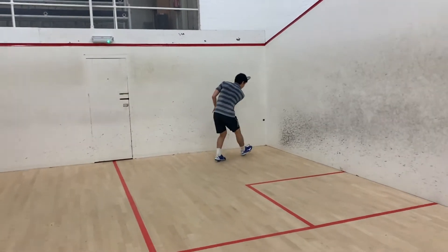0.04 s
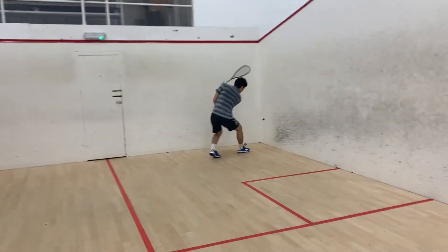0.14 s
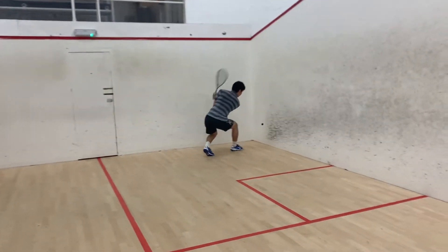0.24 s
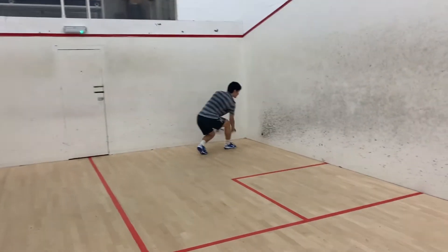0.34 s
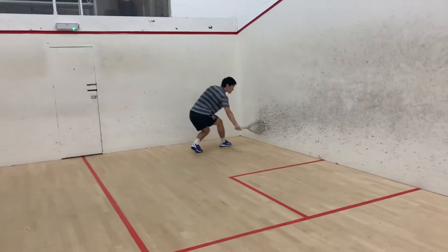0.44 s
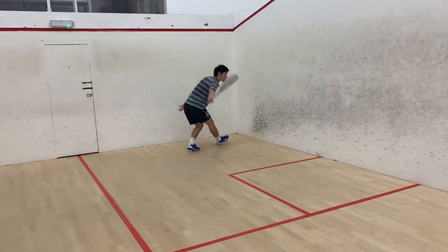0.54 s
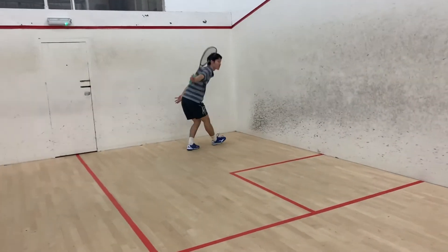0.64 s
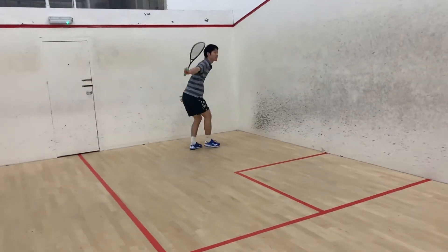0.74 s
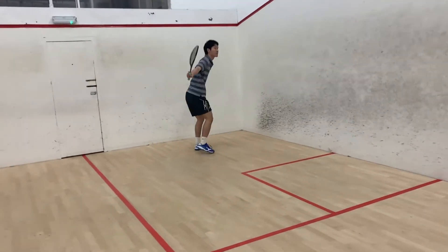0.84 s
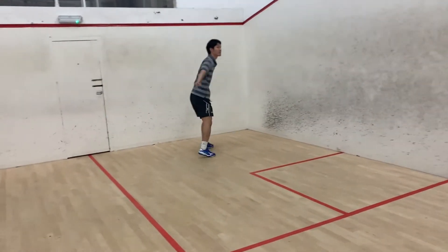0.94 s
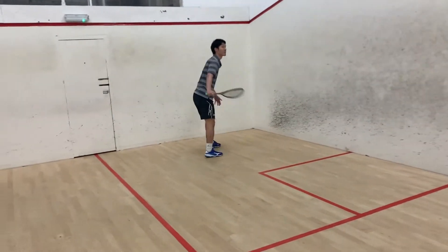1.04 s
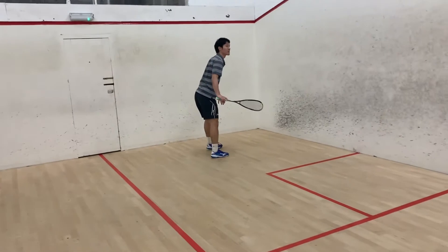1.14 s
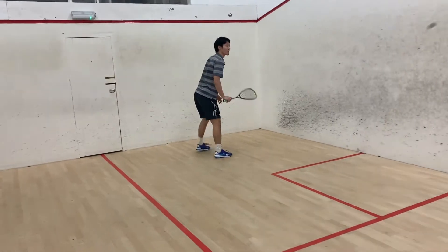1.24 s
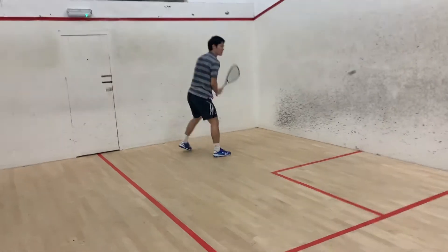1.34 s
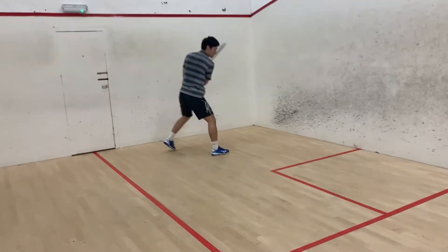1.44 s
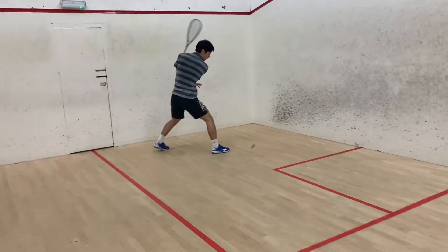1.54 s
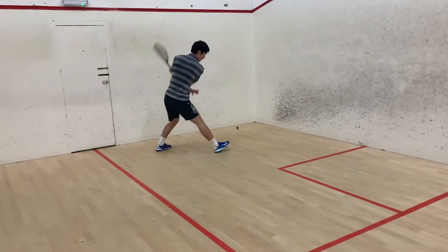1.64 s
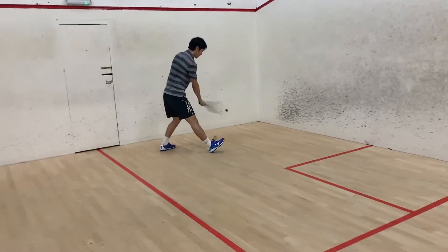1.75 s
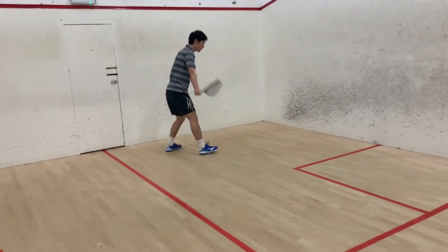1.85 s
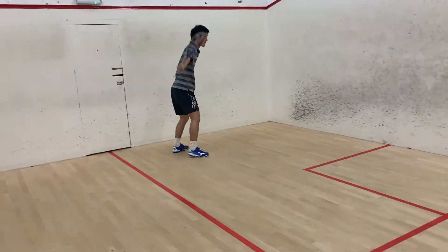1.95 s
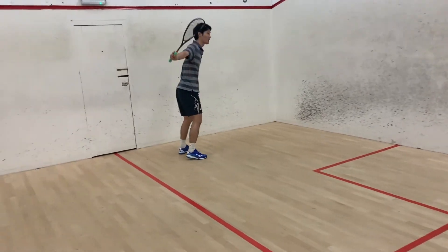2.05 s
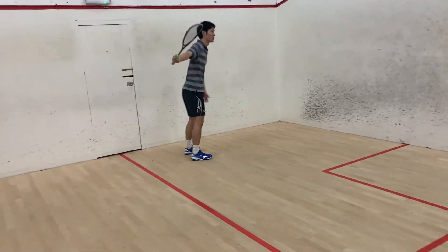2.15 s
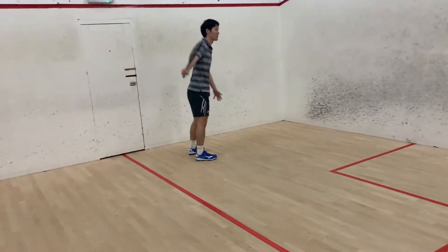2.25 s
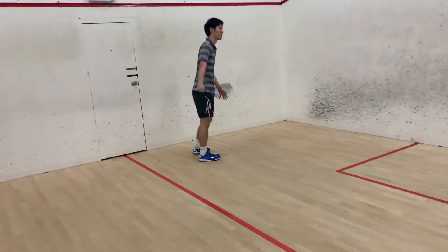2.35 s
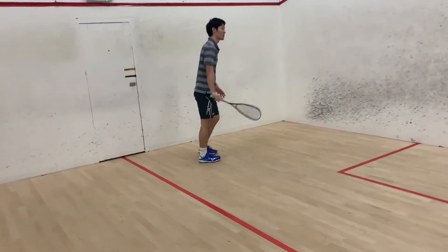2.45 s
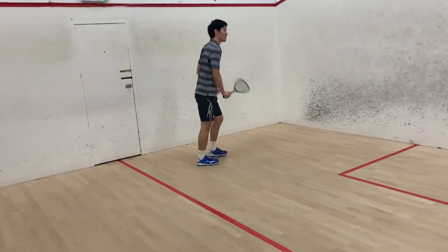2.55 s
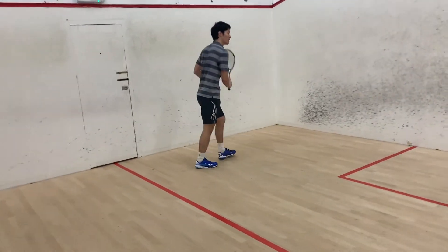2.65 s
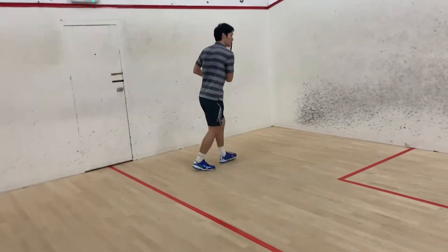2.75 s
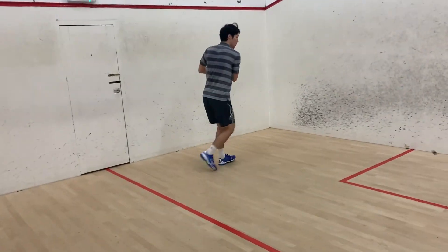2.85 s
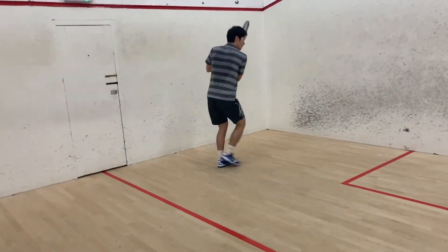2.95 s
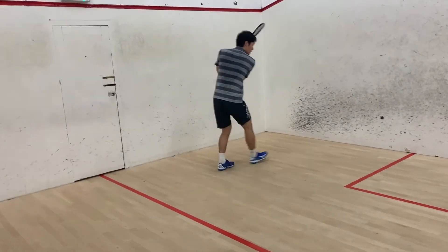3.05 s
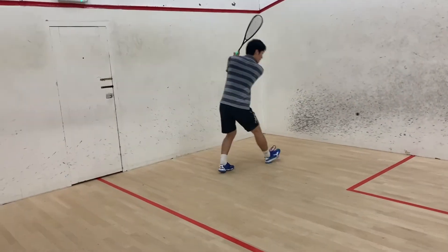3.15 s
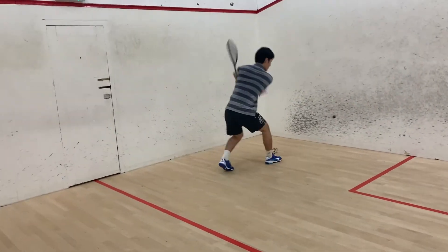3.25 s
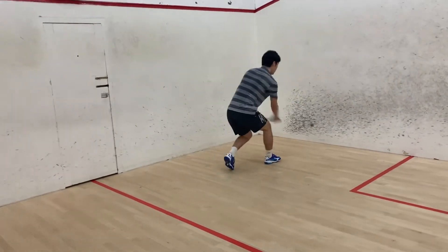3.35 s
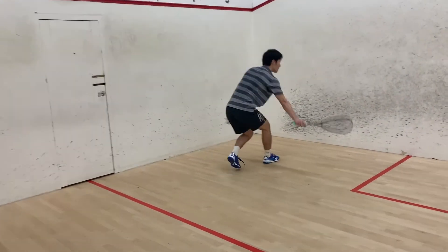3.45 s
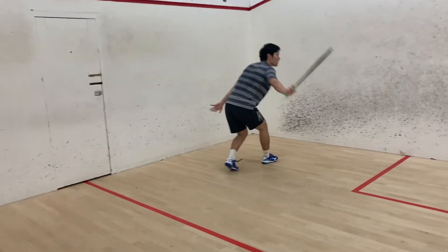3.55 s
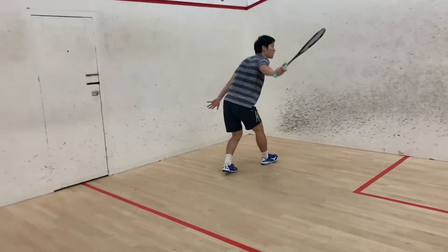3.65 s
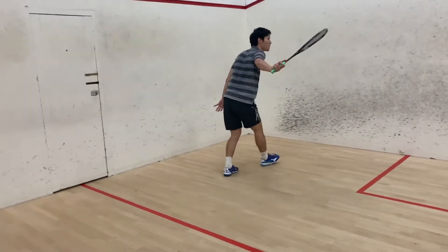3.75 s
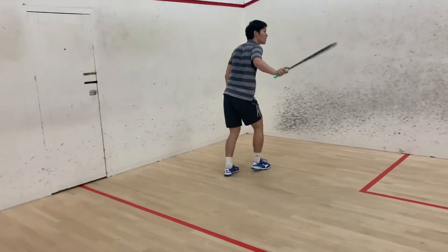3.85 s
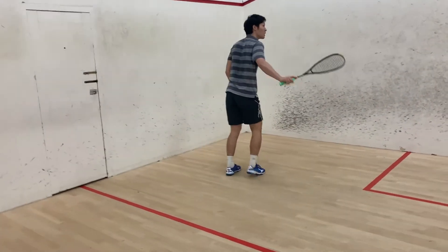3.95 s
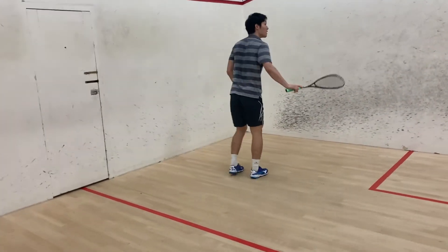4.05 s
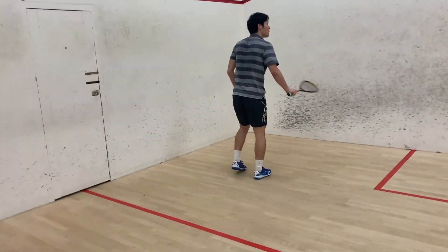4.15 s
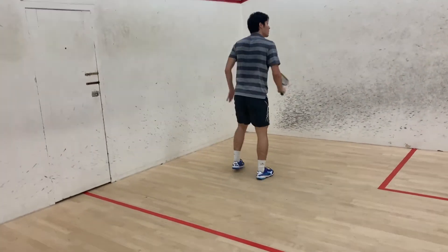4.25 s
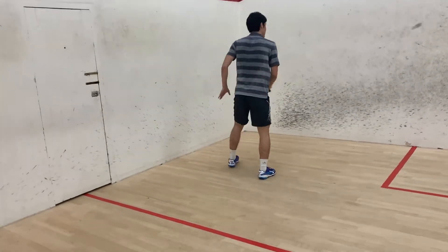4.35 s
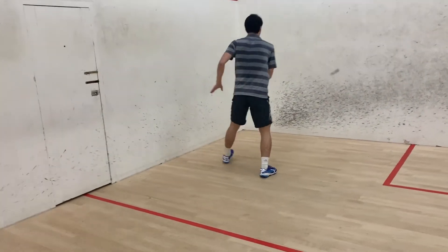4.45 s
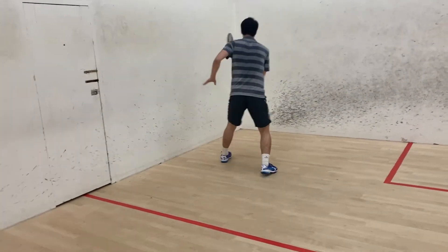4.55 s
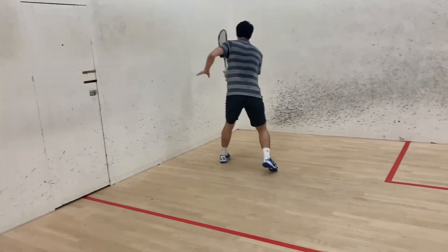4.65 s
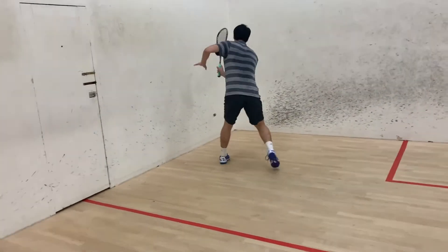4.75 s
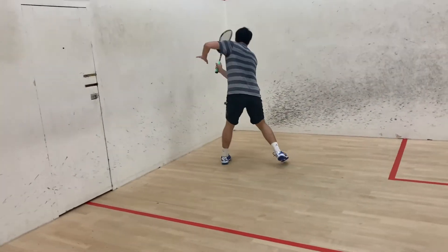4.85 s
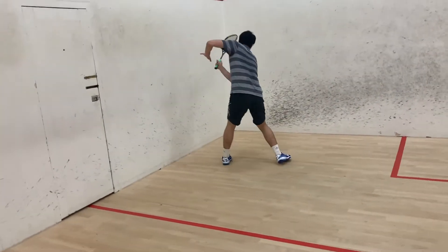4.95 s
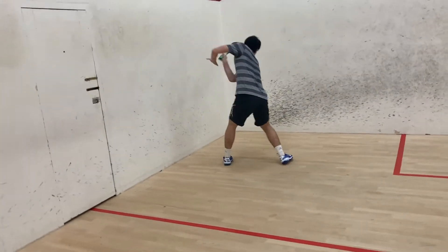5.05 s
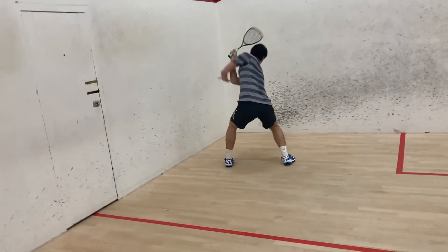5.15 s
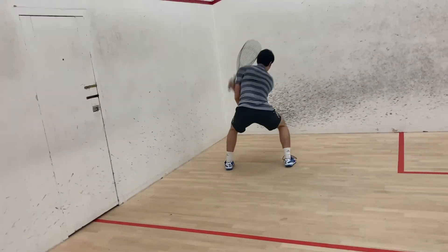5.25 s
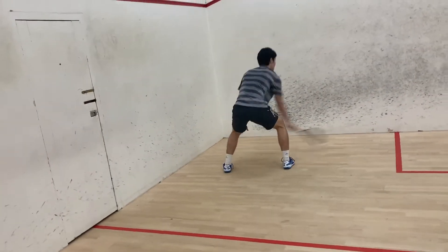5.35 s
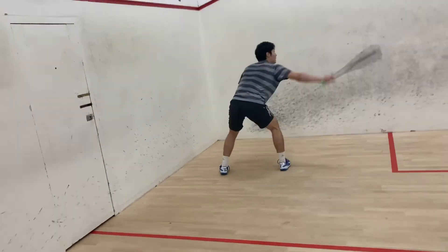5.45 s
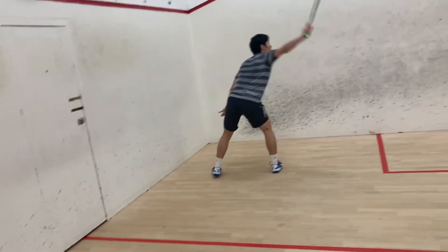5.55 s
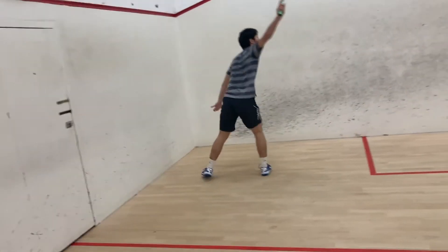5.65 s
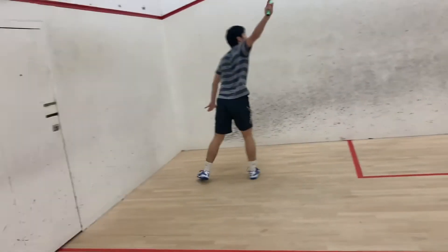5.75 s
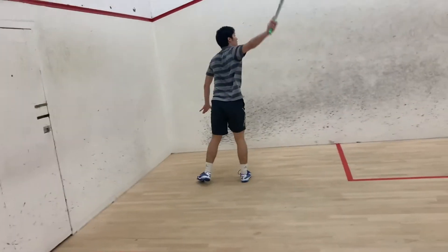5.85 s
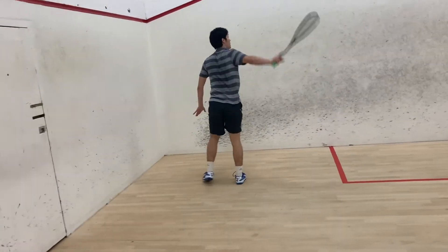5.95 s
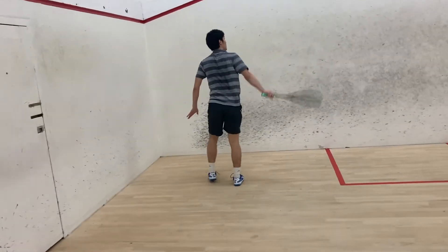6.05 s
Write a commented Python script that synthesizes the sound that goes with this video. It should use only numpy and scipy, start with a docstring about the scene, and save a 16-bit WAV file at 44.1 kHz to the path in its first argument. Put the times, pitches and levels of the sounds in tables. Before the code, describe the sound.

The sound opens in the dying ring of an earlier shot, over faint low building hum in a hard-walled squash court. At 0.46 s a short air swish ends in a hollow, stringy racket pop; at 0.7 s the ball cracks sharply on the front wall, with clattering echoes. Soft shoe and floor thuds come around 1.6 s. Near 1.8 s a very short, high sole squeak chirps with the second, brighter stroke at 1.84 s; the wall crack follows at 2.06 s, with a faint scuffed squeak just before. A low bounce thumps at 2.9 s, a softer step at 3.2 s, then stroke at 3.46 s and crack at 3.67 s. Dull thuds sound around 4.6-5 s. The strongest, woodiest stroke lands at 5.42 s, its crack at 5.6 s. Every blow blooms into seconds-long, ringing reverberation, heard from mid court, still hanging at the end.

```python
"""First an earlier crack, still ringing over building hum in a hard-walled squash court; then a lone drill.
From a microphone at mid court: racket swishes and strokes, the ball cracking on the front wall,
thuds of ball and shoe on sprung boards, squeaking soles. Blows are noise cracks over decaying modes,
swishes are swelling noise, squeaks are gliding tones; shaped noise and slowly dying tones make
the reverberation that hangs for seconds between the plaster walls."""
import sys
import numpy as np
from scipy import signal
from scipy.fft import rfft, irfft
from scipy.io import wavfile
from scipy.ndimage import uniform_filter1d

SR = 44100
rng = np.random.default_rng(int(sys.argv[2]) if len(sys.argv) > 2 else 0)


def persist_wave(psi):
    """Save psi, clipped to +-1, as 16-bit WAV."""
    counts = np.round(np.clip(psi, -1, 1) * 32767).astype(np.int16)
    wavfile.write(sys.argv[1], SR, np.atleast_2d(counts).T)


N = 269451  # samples

# Racket on ball: t/s, direct peak/dB, court level/dB, treble tilt/dB, left minus right/dB, contact null f/Hz,
# ring at the favoured pitch/dB, favoured f/Hz, fall-off away from it/(dB per octave squared)
STROKES = [(0.4594, -8, -20, -4.5, 5.5, 636, 4, 690, 6), (1.8376, -10.5, -21.5, 3.5, 3, 646, 12, 320, 1.5),
           (3.4594, -13.5, -23.5, -0.5, 8, 625, 5.5, 800, 2), (5.4213, -6.5, -18, 1.5, 3, 690, 8, 960, 11)]
# Ball on the front wall: the same columns as the strokes
CRACKS = [(0.6945, 0.5, -18, 0.21, -4.5, 1136, 4.7, 553, 13),
          (2.0564, -5.5, -15, -0.52, 14, 1200, 0.68, 397, 0.77),
          (3.674, -7.5, -16, 0.9, -12, 1183, 4.7, 500, 0.65),
          (5.6026, -5, -16.5, 0.34, 12, 1510, 13.9, 1490, 14)]
# Colour of ball on plaster: f/Hz, relative level/dB
PLASTER = [(50, -31.5), (130, -18), (300, -6.5), (1000, -12), (1600, -12), (3000, -20), (6000, -25),
           (12000, -24), (16500, -33.5)]
# Modes of frame and string bed: f/Hz, relative level/dB, t60/s
RACKET = [(342, -4, 0.018), (500, -9.5, 0.01), (818, -13, 0.018), (1042, -3, 0.011), (1603, -6.5, 0.0088)]
# Modes of ball and plaster: f/Hz, relative level/dB, t60/s
WALL = [(419, -10, 0.019), (510, -17.5, 0.027), (805, -8, 0.0085), (2205, -20, 0.006)]
EARLIER_S, EARLIER_COURT_DB = -1.1, -15.5  # a crack before the start still rings
FLOOR_ECHO = (.0035, -10, 0)  # first echo off the boards: delay/s, level/dB, blur/s


def amp(db):
    """Turn decibels into a factor on sound pressure."""
    return 10 ** (np.asarray(db) / 20)


def evened(x):
    """Bring a signal to unit RMS."""
    return x / np.sqrt(np.mean(x ** 2) + 1e-20)


def read(points, hz):
    """Read a curve of (f/Hz, value) points along a logarithmic frequency axis."""
    f, value = np.transpose(points)
    return np.interp(np.log(hz + 1), np.log(f + 1), value)


def add(mix, s, sound):
    """Lay a sound into the mix at s seconds, trimming whatever falls outside."""
    at = round(s * SR)
    sound = sound[:, max(-at, 0):]
    part = mix[:, max(at, 0):][:, :sound.shape[1]]
    part += sound[:, :part.shape[1]]


def sides(pan_db, x, lag_s=.00013):
    """Place a direct sound by level; the right port hears it a little sooner."""
    late = np.concatenate([np.zeros(round(lag_s * SR)), x])[:len(x)]
    return amp([[pan_db / 2], [-pan_db / 2]]) * np.array([late, x])


def noise(seconds, shape_db):
    """Two partly alike channels of noise; shape_db(hz, t) sets the level of every bin."""
    # Likeness swings in sign across the treble: f/Hz, left-right likeness
    likeness = [(60, 1), (130, 0.78), (290, 0.83), (640, -0.17), (1400, -0.23), (3100, 0.03), (7000, 0.17),
                (8600, -1.35), (9600, -0.23), (11500, 1.5), (13500, -3), (15300, 2.4)]
    # Stereo balance: f/Hz, left minus right/dB
    balance = [(60, 1.5), (200, 0.5), (700, 2), (2400, 1.5), (8000, 0)]
    frames = int(seconds * SR) // 128 + 5
    hz = np.fft.rfftfreq(512, 1 / SR)[:, None]
    a, b, c, d = rng.standard_normal((frames, 257, 4)).T
    same = np.clip(read(likeness, hz), -1, 1)
    left = a + 1j * b
    right = same * left + np.sqrt(1 - same ** 2) * (c + 1j * d)
    level_db = shape_db(hz, np.arange(frames) * 128 / SR)
    balance_db = np.array([.5, -.5])[:, None, None] * read(balance, hz)
    bins = np.array([left, right]) * amp(level_db + balance_db)
    return signal.istft(bins, nperseg=512, noverlap=384)[1][:, :int(seconds * SR)]


def court(seconds=3, lumpy_s=0.06, patchy_db=2.0):
    """Reflections that start uneven and crowd together in patches, each band dying at its own speed."""
    # Reverberation: f/Hz, t60/s
    decay = [(50, 5.15), (110, 0.29), (200, 2), (420, 2.96), (1100, 3.15), (2900, 2.57), (5500, 1.56),
             (8000, 1.116), (12000, 0.62), (16000, 0.35)]
    # Low reflections gather later: f/Hz, rise time/s
    bass_rise = [(300, 0.023), (1000, 0.014), (2500, .006)]
    lumps_db, rise_s = 4.5, .007  # early bunching; time the reflections need to crowd together

    def level_db(hz, t):
        patches = uniform_filter1d(rng.standard_normal((len(t), len(hz))), size=5, axis=0)
        patches = uniform_filter1d(patches, size=4, axis=1).T
        rise = 1.001 - np.exp(-(t / read(bass_rise, hz)) ** 2)
        return 20 * np.log10(rise) - 60 * t / read(decay, hz) + patchy_db * evened(patches)

    tail = noise(seconds, level_db)
    t = np.arange(tail.shape[1]) / SR
    knots = t[::110]
    lumps = np.interp(t, knots, np.tanh(rng.standard_normal(len(knots))))
    bunching = amp(lumps_db * lumps * np.exp(-t / lumpy_s))
    return tail * bunching * (1 - np.exp(-(t / rise_s) ** 2))


def grain(size):
    """A causal filter of random narrow peaks and dips, about 15 Hz wide, drawn anew for each blow's tail."""
    grain_db = 2
    bumps = uniform_filter1d(rng.standard_normal(size // 2 + 1), size=30)
    bumps = evened(uniform_filter1d(bumps, size=30))
    log_gain = np.log(amp(grain_db * np.concatenate([bumps, bumps[-2:0:-1]])))
    return np.exp(np.conj(signal.hilbert(log_gain)))[:size // 2 + 1]  # minimum phase


def ringing(court_db, colour, modes, treble_db, null_hz, null_width):
    """The court's answer to one blow: crack colour, modes, contact-time null and uneven ringing."""
    tail = court()
    hz = np.fft.rfftfreq(tail.shape[1], 1 / SR)
    crack = amp(read(colour, hz) + read([(1500, 0), (6000, treble_db)], hz))
    # each mode is a resonance, narrower the longer it rings
    rings = sum(amp(db) ** 2 / (1 + ((hz - f) * t60 / 0.76) ** 2) for f, db, t60 in modes)
    low_cut = np.minimum(hz / modes[0][0], 1)
    null = 1 - .8 * np.exp(-(np.log(hz / null_hz + 1e-9) / null_width) ** 2)
    response = np.sqrt(crack ** 2 + rings * low_cut ** 2) * null * grain(tail.shape[1])
    tail = irfft(rfft(tail) * response)
    tail *= np.clip(np.linspace(11, -1, tail.shape[1]), 0, 1)  # fade the end to silence
    return amp(court_db) * tail / np.sqrt(np.mean(tail[:, :SR // 10] ** 2))


def standing(tones, spread_hz):
    """Slowly dying tones, each a close pair that beats, with its own phase at each port."""
    t = np.arange(3 * SR) / SR
    out = np.zeros((2, len(t)))
    for hz, db, t60 in tones:
        shift, left, right = rng.random((2, 3)).T[:, :, None]
        turn = 2 * np.pi * (hz + spread_hz * (shift - .5)) * t
        pair = [(amp([[0], [-6]]) * np.sin(turn + 2 * np.pi * phase)).sum(0) for phase in (left, right)]
        out += amp(db - 60 * t / t60) * np.array(pair)
    return out * (1 - np.exp(-t / 0.026)) * np.minimum((3 - t) / .3, 1)


def struck(modes, ring_db, favoured_hz, fall_db):
    """The modes as one blow excites them: those near the favoured pitch ring most."""
    return [(hz, db + ring_db - abs(fall_db) * np.log2(hz / favoured_hz) ** 2, t60)
            for hz, db, t60 in modes]


def snap(size, treble_db):
    """Noise with the colour of the bare crack, tilted above 3 kHz."""
    # Bare crack: f/Hz, relative level/dB
    crack_colour = [(400, -36.5), (1500, 6.5), (2500, 16.5), (4500, 6.5), (9000, -7), (16000, -9.5)]
    hz = np.fft.rfftfreq(size, 1 / SR)
    colour_db = read(crack_colour, hz) + read([(3000, 0.0055), (9000, treble_db)], hz)
    return irfft(rfft(rng.standard_normal(size)) * amp(colour_db), size)


def blow(peak_db, modes, treble_db, crack_s, crack_db, cycles, echoes):
    """A short rubbery noise crack over modes that swell in within about one cycle, with its first echoes."""
    t = np.arange(8192) / SR
    crack = snap(len(t), treble_db) * t / crack_s * np.exp(-t / crack_s)
    crack /= np.sqrt(np.sum(crack ** 2) / (SR * crack_s))
    rings = sum(amp(db - 60 * t / t60) * (1 - np.exp(-(t * hz / cycles) ** 2)) * np.sin(2 * np.pi * hz * t)
                for hz, db, t60 in modes)
    x = rings / abs(rings).max() + amp(crack_db) * crack
    x = x + sum(amp(db) * np.roll(uniform_filter1d(x, 1 + round(blur_s * SR)), round(s * SR))
                for s, db, blur_s in echoes)
    return amp(peak_db) * x / abs(x).max()


def hits(rows, colour, modes, crack_s, crack_db, cycles, null_width, echoes):
    """Each blow arrives direct and then fills the court."""
    mix = np.zeros((2, N))
    for s, peak_db, court_db, treble_db, pan_db, null_hz, *favoured in rows:
        rung = struck(modes, *favoured)
        direct = blow(peak_db, rung, treble_db, crack_s, crack_db, cycles, echoes)
        add(mix, s, sides(pan_db, direct))
        add(mix, s, ringing(court_db, colour, rung, treble_db, null_hz, null_width))
    return mix


def background():
    """Steady building noise and the dying crack of the previous shot."""
    # Building hum and air: f/Hz, relative level/dB
    hall = [(18, -40), (30, -16), (59, -2), (106, -20.5), (134, -14.5), (355, -20), (1190, -27.5),
            (1350, -44.5), (2230, -30), (16000, -68.5)]
    hall_db = -47
    hum = evened(noise(N / SR + .01, lambda hz, t: read(hall, hz) + 0 * t))
    mix = amp(hall_db) * hum[:, :N]
    earlier = ringing(EARLIER_COURT_DB, PLASTER, WALL, treble_db=2.0, null_hz=1186, null_width=0.021)
    add(mix, EARLIER_S, earlier)
    return mix


def lingering():
    """Strokes and cracks leave court tones hanging; strokes also leave the string bed's notes."""
    # Court tones that outlast the wash: f/Hz, level against the court level/dB, t60/s
    court_tones = [(353, -23, 3.2), (529, -22, 4.1), (776, -20, 3.5), (850, -22, 6.1), (1090, -23.5, 4.3)]
    # String-bed notes hanging in the court: f/Hz, level against the court level/dB, t60/s
    string_tones = [(1072, -17, 1.4), (1645, -20, 1.4)]
    mix = np.zeros((2, N))
    for s, court_db in [row[0:3:2] for row in STROKES + CRACKS] + [(EARLIER_S, EARLIER_COURT_DB)]:
        add(mix, s, amp(court_db) * standing(court_tones, spread_hz=13.65))
    for s, _, court_db, *_ in STROKES:
        add(mix, s, amp(court_db) * standing(string_tones, spread_hz=30))
    return mix


def squeaks():
    """Stick-slip tones with a wavering, gliding pitch, a rough level and a scrape, carried on by the court."""
    # Short slips of a rubber sole: t/s, length/s, f/Hz, level about which it scatters/dB,
    # second harmonic/dB, pitch spread/share, glide/(Hz per s)
    slips = [(1.782, 0.0052, 3860, -26, -13, .01, -30000), (1.79, 0.0045, 3920, -13.5, -19.5, 0.006, 4997),
             (1.795, 0.017, 3830, -23.5, -14, 0.03, 3998.5), (1.805, 0.017, 4510, -23, -14, 0.025, -15000),
             (1.81, 0.018, 3690, -21, -21, 0.026, -20000), (1.815, 0.016, 4120, -27, -16, 0.0077, 24997.5),
             (1.825, 0.021, 4300, -9, -30, 0.0055, 3002), (1.839, 0.01, 4357, -4, -39.5, 0.0037, -3000),
             (1.977, 0.0095, 3314, -17.5, -8.5, 0.034, -8000),
             (1.988, 0.024, 3400, -25.5, -11, 0.045, -9000), (2.008, 0.029, 3250, -29, -13, 0.05, -6000)]
    # The clearest slip keeps ringing: t/s, then its tones as (f/Hz, level/dB)
    ring_s, ring_tones = 1.835, [(4297, -39), (4350, -36)]
    ring_t60_s, wet_db = 1.9, -9.5  # wet_db: court share
    rough_db, rasp_db = 148, -18  # level scatter per share of pitch spread; scrape against second harmonic
    shoe = np.zeros((1, N))
    for start, length, hz, peak_db, overtone_db, spread, glide in slips:
        t = np.arange(0, length, 1 / SR)
        waver, grip = [evened(uniform_filter1d(rng.standard_normal(2000), size=60))[:len(t)]
                       for _ in range(2)]
        pitch_hz = (hz + glide * (t - length / 2)) * (1 + spread * np.tanh(waver))
        turn = 2 * np.pi * np.cumsum(pitch_hz) / SR
        rasp = amp(rasp_db) * evened(np.diff(rng.standard_normal(2001)))[:len(t)]
        swell = amp(peak_db + rough_db * spread * np.tanh(grip)) * np.sin(np.pi * t / length)
        slip = swell * (np.sin(turn) + amp(overtone_db) * (np.sin(2 * turn) + rasp))
        add(shoe, start, slip[None])
    tail = court(patchy_db=.8)
    wet = signal.fftconvolve(shoe, tail / np.linalg.norm(tail[0, :SR // 20]), axes=1)[:, :N]
    mix = sides(4.2, shoe[0]) + amp(wet_db) * wet
    add(mix, ring_s, standing([(*tone, ring_t60_s) for tone in ring_tones], spread_hz=12))
    return mix


def swishes(fade_s=0.012):
    """Air noise that swells with the racket's speed and fades after the blow."""
    # Swings up to the ball: end t/s, length/s, level before the swell/dB
    swings = [(0.472, 0.081, -27), (1.834, 0.13, -31), (3.478, .07, -24.5), (5.424, 0.088, -26)]
    # Colour of the rushing air: f/Hz, relative level/dB
    air_colour = [(80, -27), (300, 29.5), (1000, 14.5), (4000, 11), (16000, 1)]
    mix = np.zeros((2, N))
    for end, length, level_db in swings:
        air = evened(noise(length + fade_s, lambda hz, t: read(air_colour, hz) + 0 * t))
        t = np.arange(air.shape[1]) / SR
        speed = np.interp(t, [0, length, length + fade_s], [0, 1, 0])
        add(mix, end - length, amp(level_db) * air * speed ** 2.43)
    return mix


def corner():
    """Every stroke comes back, duller, from the back corner by the same few echoes."""
    # Back-corner echoes: delay t/s, level against the stroke/dB
    returns = [(.004, -4), (0.022, -28)]
    mix = np.zeros((2, N))
    rung = struck(RACKET, ring_db=0, favoured_hz=300, fall_db=0.5)
    for s, peak_db, _, treble_db, pan_db, *_ in STROKES:
        for delay_s, loss_db in returns:
            echo = blow(peak_db + loss_db, rung, treble_db, crack_s=0.0019, crack_db=-26 + treble_db,
                        cycles=0.48, echoes=[FLOOR_ECHO])
            add(mix, s + delay_s, sides(pan_db, echo))
    return mix


def slaps():
    """Short pitched knocks: parts of the blows and echoes that stand out, each ringing at one pitch."""
    # Knocks: t/s, peak level/dB, brightness/dB, left minus right/dB, f/Hz
    knocks = [(0.4605, -10.5, -5, -3, 715), (0.4675, -13, -8, 3, 340), (0.479, -19, -10, 2, 310),
              (0.521, -13, -10, -2, 375), (0.572, -16, -10, 8, 365), (0.601, -15, -10, 6, 407),
              (0.705, -19.5, 17, 27, 2050), (0.712, -13, 10, -8, 2200), (0.737, -15, 3, 5, 320),
              (0.792, -24, -6, 4, 384), (0.851, -15.5, -8, 6, 366), (1.652, -28, -15, 4, 114),
              (1.712, -26, -15, 0, 110), (1.732, -29, -15, 0, 124), (1.772, -42, -15, 0, 111),
              (2.066, -10, 10, -19, 2160), (2.087, -14.5, -1, 4, 863), (2.093, -8, -11, -3, 300),
              (2.111, -13, -11, -5, 370), (2.148, -26, -6, 2, 340), (2.948, -22.5, -15, -2, 150),
              (2.985, -23, -15, .5, 161), (3.255, -28, -15, 3, 119), (3.464, -12.5, -11, 2.1, 350),
              (3.495, -25, -4, 5, 493), (3.678, -8, 11, 9, 403), (3.6995, -5, 3, -1, 726),
              (3.711, -14, -1, 19, 1900), (3.725, -12, 5, 5, 470), (3.733, -18, -3, 2, 760),
              (3.767, -13, -5, .5, 850), (4.705, -23, -5, 7, 320), (4.725, -22, -13, 1.1, 186),
              (4.764, -25, -15, 1.1, 131), (4.808, -23, -11, 0, 213), (4.972, -25, -10, -1, 268),
              (5.13, -34, -14.5, 2, 98), (5.4227, -4, -10, 1, 960), (5.426, -9, -13.5, -3, 294),
              (5.529, -14, -8, 1.1, 402), (5.586, -14.5, -8, 2, 336), (5.604, -12.5, -6, -5, 525),
              (5.6155, -13, -3, 6, 900), (5.617, -10, 14, 21, 2300), (5.6446, -3.5, -7, 5, 794),
              (5.752, -12, -11, 2.1, 830)]
    ring_cycles = 10.3  # until the tone is 60 dB down
    mix = np.zeros((2, N))
    for s, peak_db, bright_db, pan_db, hz in knocks:
        knock = blow(peak_db, [(hz, 0, ring_cycles / hz)], bright_db, crack_s=0.00067,
                     crack_db=-11.5 + bright_db, cycles=0.7, echoes=[FLOOR_ECHO])
        add(mix, s, sides(pan_db, knock))
    return mix


def thuds():
    """Ball or sole on sprung boards: low modes under a soft crack, with an echo along the court and back."""
    # Floor blows: the same columns as the strokes
    floor_blows = [(0.066, -36, -44, -1, 1.5, 427, -2, 220, 3.6),
                   (0.47, -22.5, -37, -6, 3, 430, 2, 127, 18),
                   (1.574, -37, -52.5, 20, 2.5, 420, -5, 220, 6.5),
                   (1.637, -26.5, -33, 7, 4, 286, 3.5, 101, 1.6),
                   (2.889, -19.5, -32.5, 3, 1, 430, 9, 159, 93),
                   (3.226, -33.5, -37.5, -6.5, -2, 385, -12, 151, 0.9),
                   (4.569, -35, -41.5, -3, 2, 420, -2.5, 94, 20),
                   (4.703, -22, -29.5, 5, 1, 412, 6, 264, 2.8),
                   (4.999, -25, -46.5, -23.5, 3, 420, 23, 95, 17),
                   (5.43, -40.5, -35.5, -8, -1, 420, 14, 89, 37)]
    # Colour of ball or sole on boards: f/Hz, relative level/dB
    board_colour = [(40, -50), (90, -59), (260, -18), (500, -19), (1500, -24), (6000, -45), (16000, -53.5)]
    # Modes of the sprung boards: f/Hz, relative level/dB, t60/s
    board_modes = [(93.6, -2, 0.05), (114.7, -8, 0.086), (161, -5, 0.063), (207.4, -3.5, 0.05),
                   (272, -15, 0.062)]
    end_echo = (.058, -12, .0005)  # delay/s, level/dB, blur/s
    return hits(floor_blows, board_colour, board_modes, crack_s=0.0025, crack_db=-15, cycles=1.12,
                null_width=0.045, echoes=[end_echo])


def cracks():
    """Ball on the front wall: a very short, strong noise crack over brief plaster modes."""
    return hits(CRACKS, PLASTER, WALL, crack_s=0.001, crack_db=1.0, cycles=1.03,
                null_width=0.14, echoes=[FLOOR_ECHO])


def strokes():
    """Racket on ball: frame and string-bed modes ring under a short, softer noise crack."""
    # Colour of ball on strings: f/Hz, relative level/dB
    string_colour = [(50, -12), (130, -7.5), (300, 2.5), (1000, -1.5), (1680, -13), (1900, -15),
                     (4000, -15.5), (8000, -22), (12000, -25.5), (16500, -39.5)]
    return hits(STROKES, string_colour, RACKET, crack_s=0.002, crack_db=-8.0, cycles=1.14,
                null_width=0.079, echoes=[FLOOR_ECHO])


def scene():
    """Sum the court, the player's movements and the blows at the microphone."""
    room = background() + lingering()
    player = squeaks() + swishes()
    knocks_and_echoes = corner() + slaps()
    return room + player + knocks_and_echoes + thuds() + cracks() + strokes()


def record(dry):
    """The microphone drops the deep bass; soft overload near full scale; then the band limit."""
    bass_cut = signal.butter(N=3, Wn=55, btype="high", fs=SR, output="sos")
    thin = signal.sosfilt(bass_cut, dry)
    band_limit = signal.firwin(511, 16800, window=("kaiser", 9), fs=SR)  # low-pass edge in Hz
    return signal.oaconvolve(np.tanh(thin), band_limit[None], "same")


dry = scene()
out = record(dry)
persist_wave(out)
```